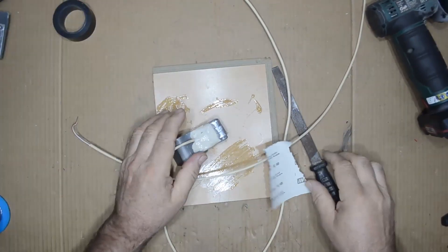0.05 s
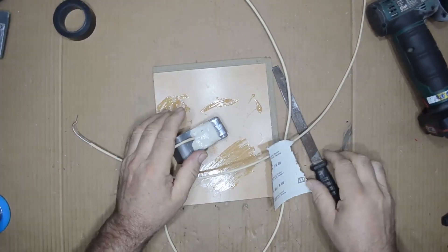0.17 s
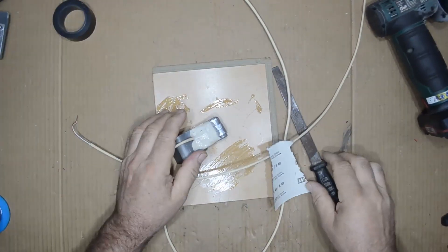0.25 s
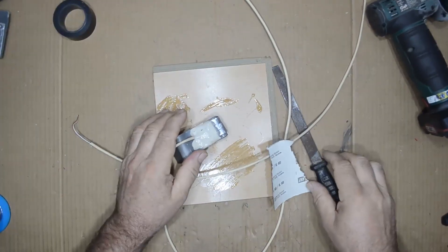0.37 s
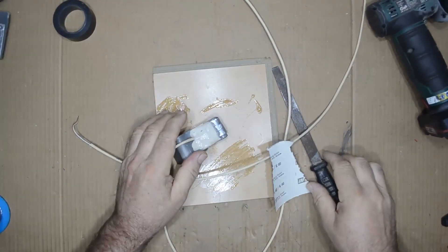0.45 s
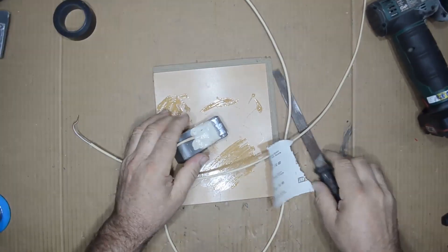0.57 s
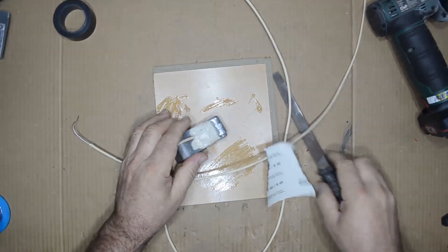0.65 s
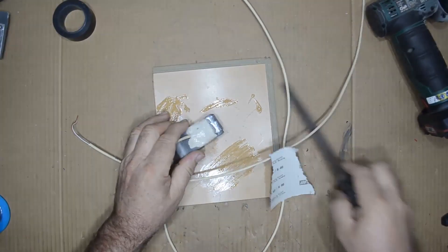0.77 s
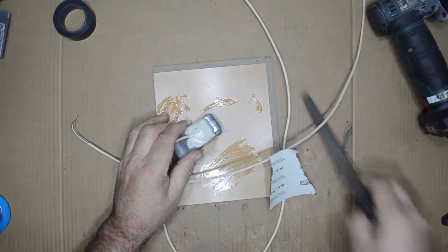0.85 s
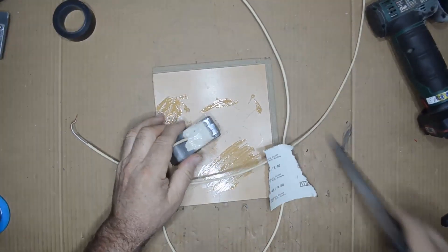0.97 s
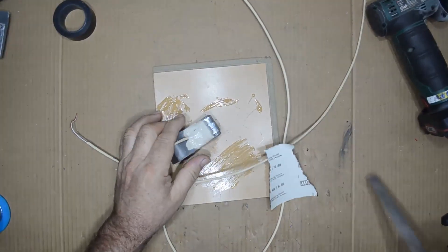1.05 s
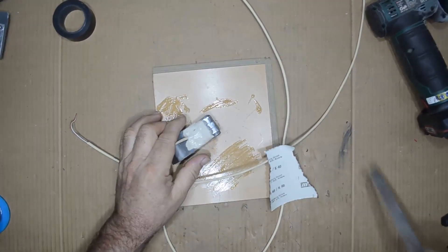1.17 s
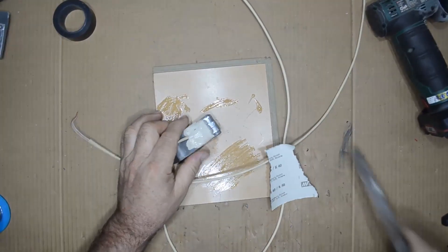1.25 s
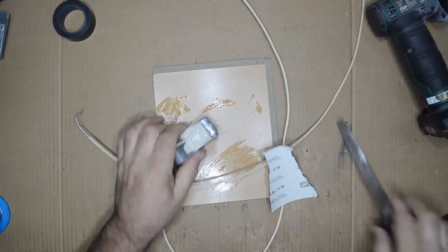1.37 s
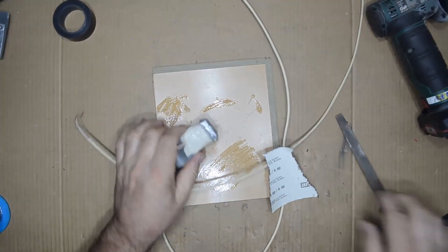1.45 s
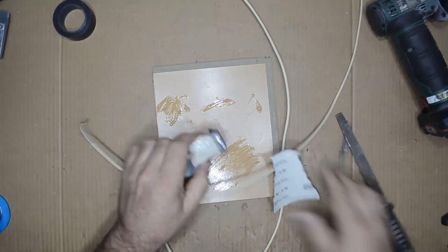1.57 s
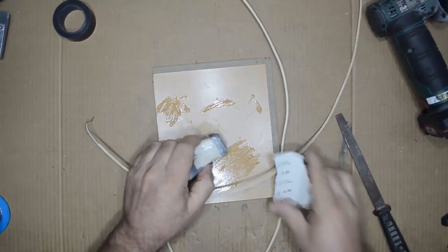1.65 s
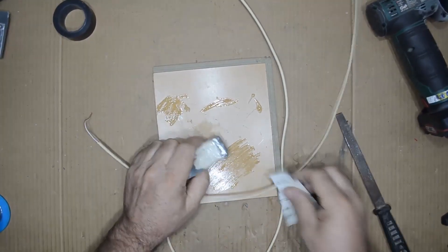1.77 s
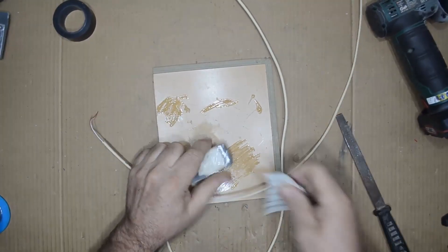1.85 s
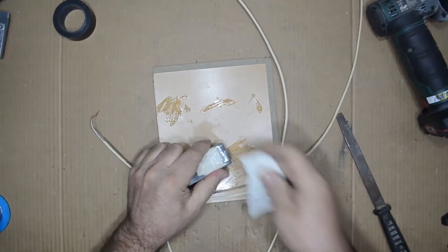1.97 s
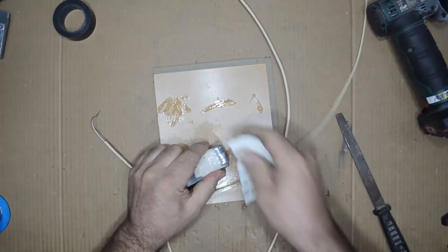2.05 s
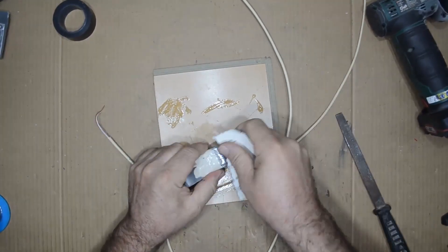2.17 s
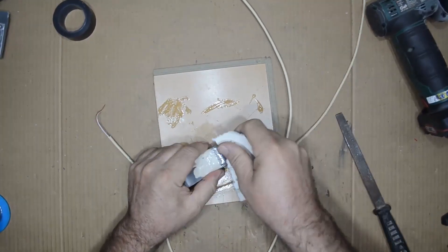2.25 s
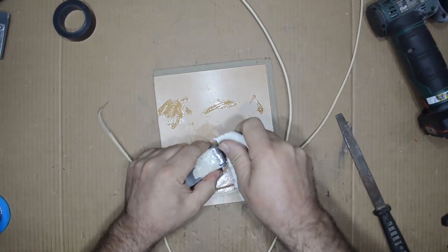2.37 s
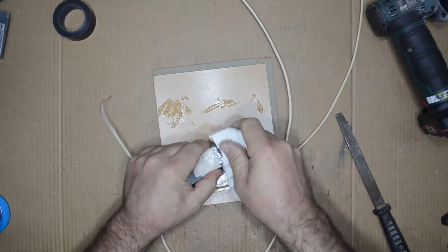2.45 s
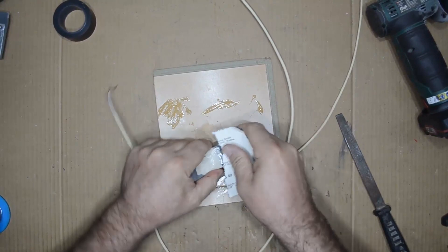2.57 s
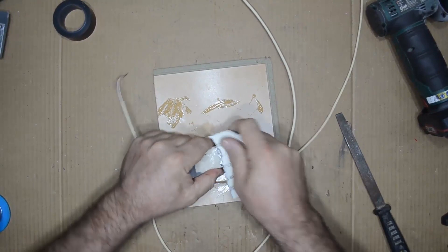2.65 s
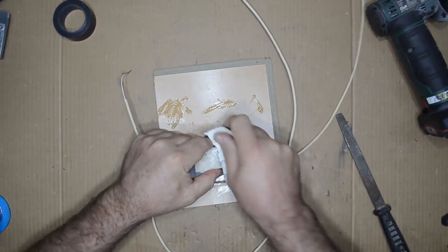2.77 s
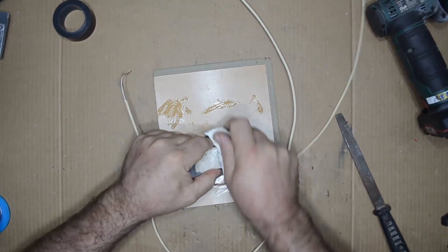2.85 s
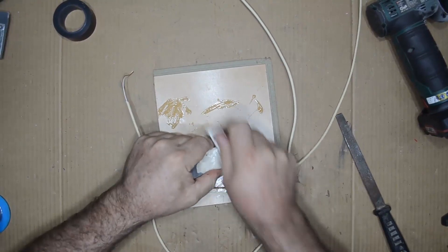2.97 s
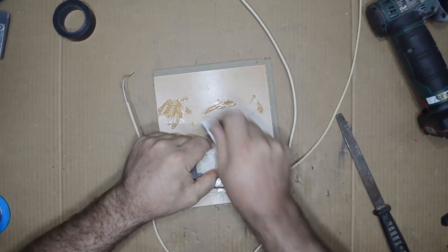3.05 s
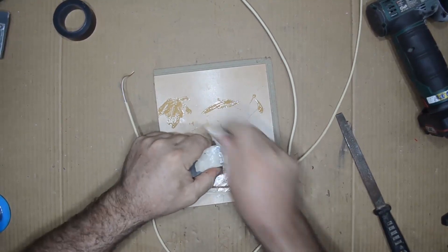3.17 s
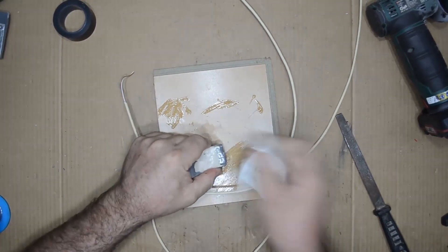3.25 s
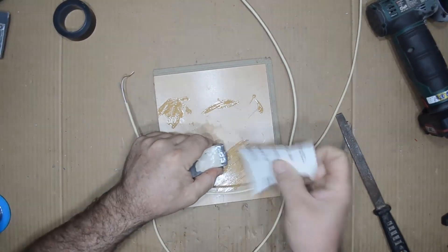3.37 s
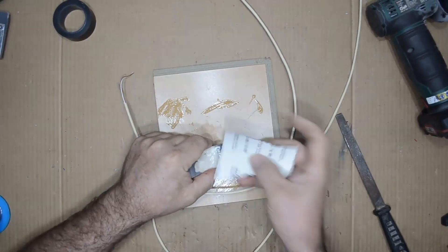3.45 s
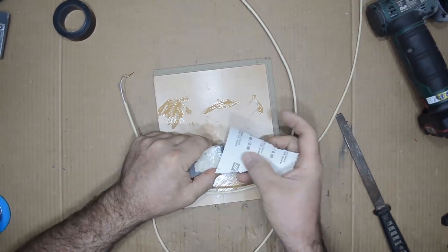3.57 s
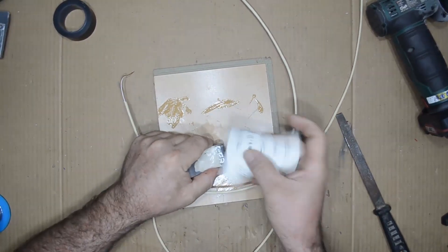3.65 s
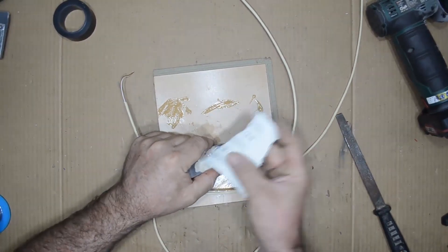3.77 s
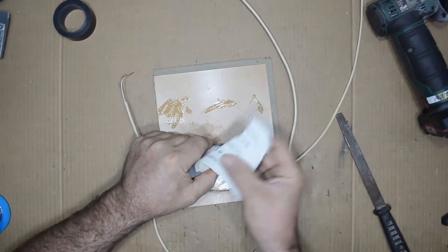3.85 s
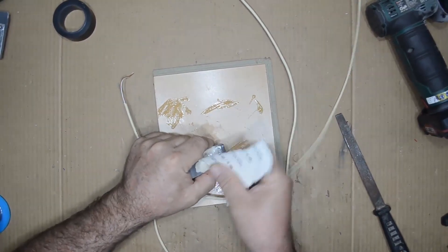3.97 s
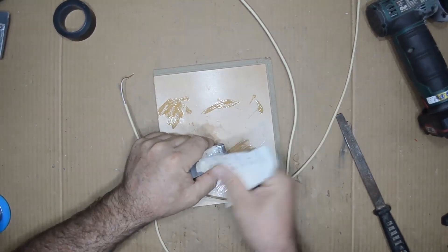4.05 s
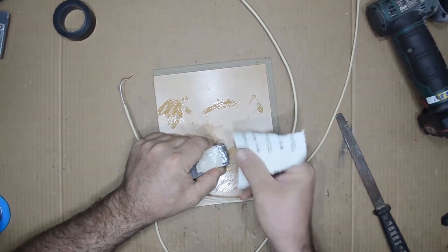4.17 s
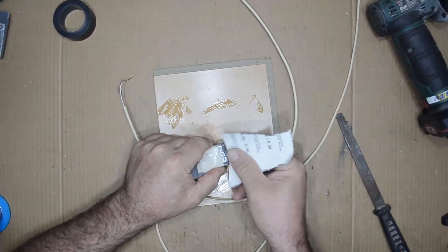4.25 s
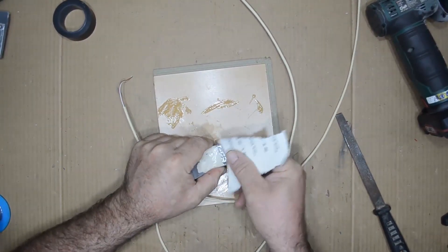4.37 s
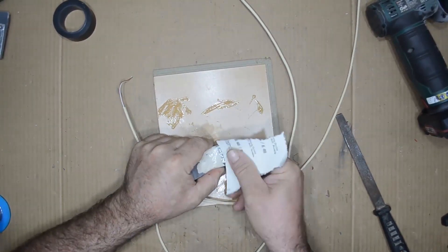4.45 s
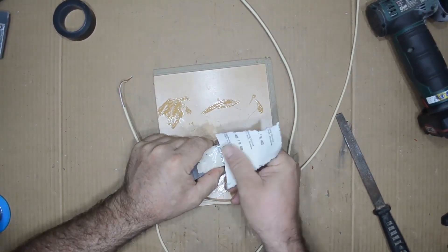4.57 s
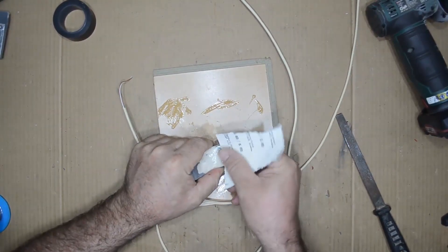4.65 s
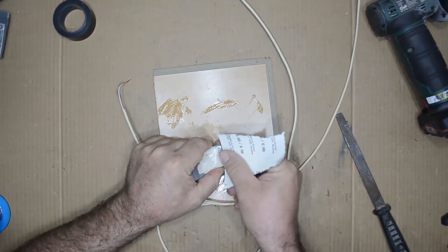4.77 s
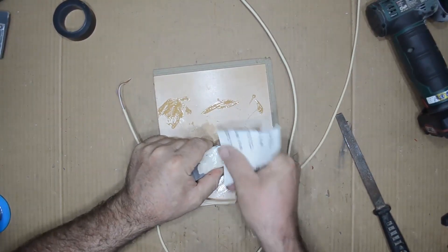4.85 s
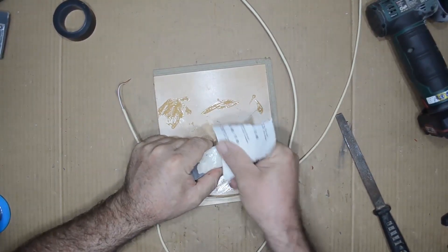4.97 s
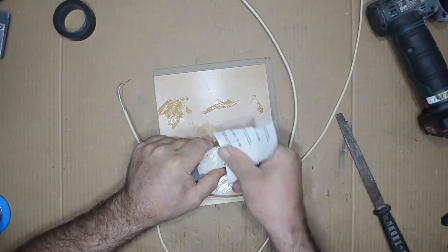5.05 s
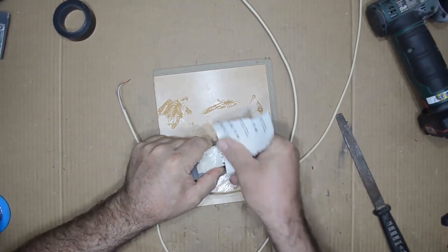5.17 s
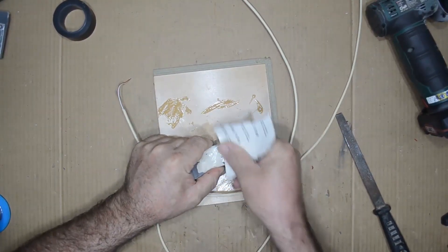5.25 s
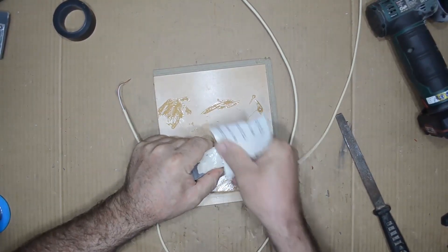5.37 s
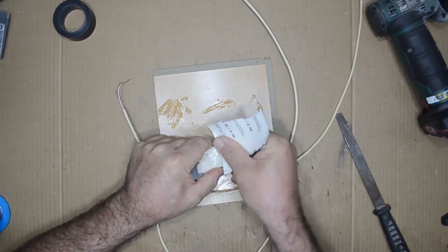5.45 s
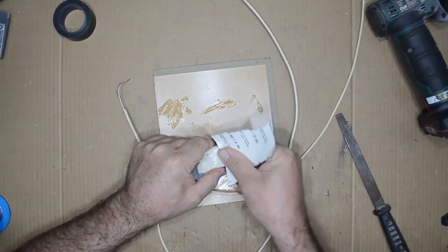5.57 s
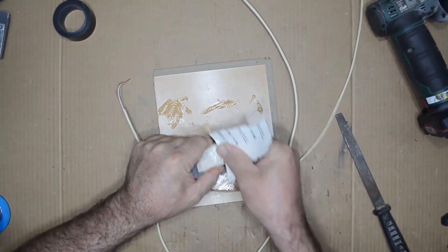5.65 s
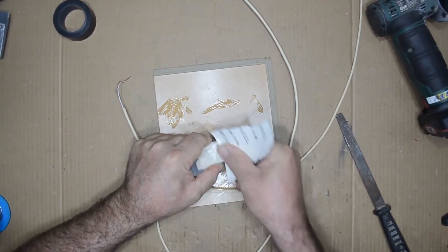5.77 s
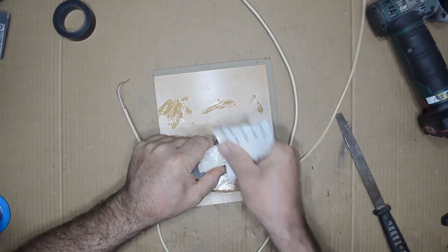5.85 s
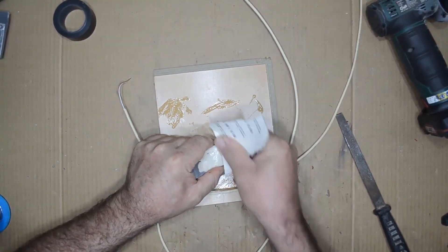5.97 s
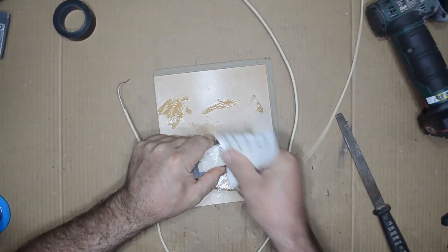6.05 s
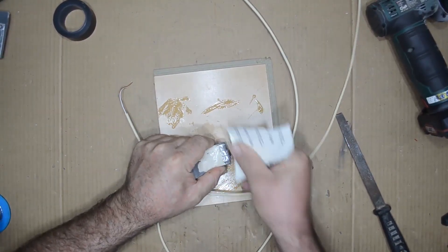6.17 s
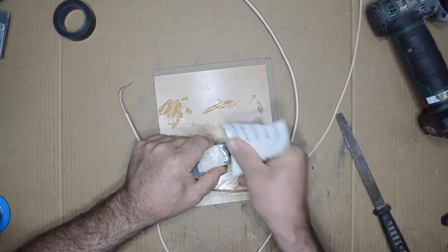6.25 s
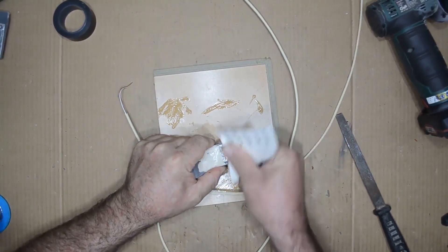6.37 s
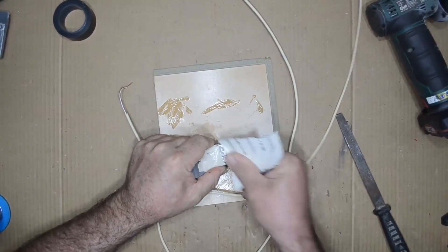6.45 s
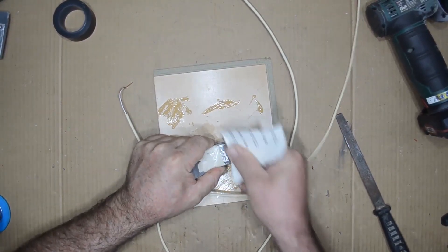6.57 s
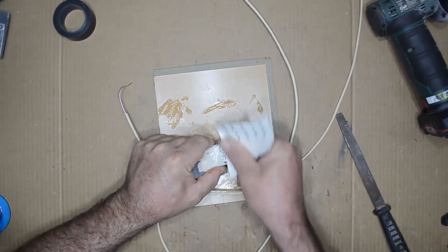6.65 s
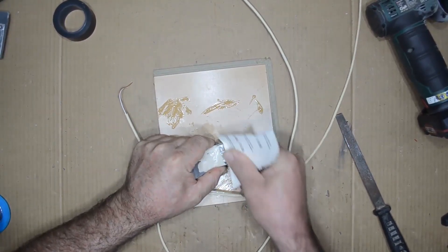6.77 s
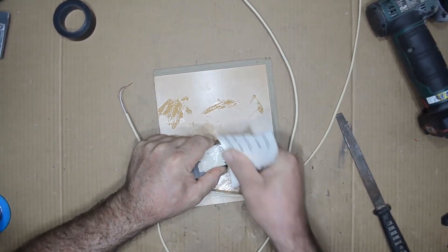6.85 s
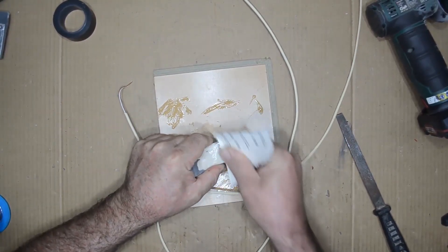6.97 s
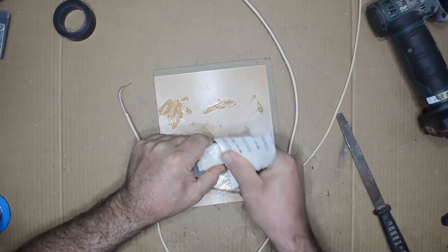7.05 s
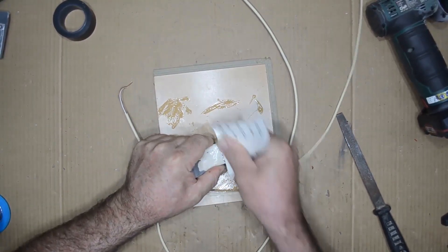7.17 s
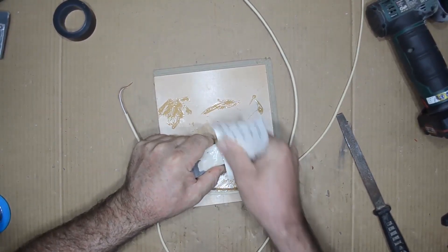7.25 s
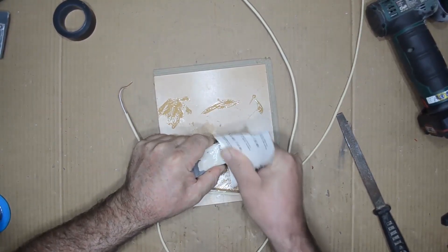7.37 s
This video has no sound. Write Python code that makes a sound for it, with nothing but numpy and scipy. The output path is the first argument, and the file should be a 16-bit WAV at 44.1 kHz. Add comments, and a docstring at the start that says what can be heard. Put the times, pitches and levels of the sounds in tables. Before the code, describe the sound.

Low, soft room air runs throughout, with a close perspective and a short hard-room echo. From 0 to 1 s a file drags lightly over cardboard, with barely audible wavering squeaks and small taps, and a firmer knock at 0.94. Around 1.3-1.8 s it is laid down: scrapes, weighty thuds, a loud hard clack at 1.62 and another knock near 1.78. Sandpaper is snatched up at 1.7, then crinkles and rustles from 2 to 4 s, with crisp folds and snaps strongest around 2.85-3.1. It nearly falls quiet from 4.1 to 4.7, with only faint rustle and two light taps. From 4.8 s short gritty strokes rub a small hollow metal part, dry and mid-pitched, with a bright snap at 5.1. They come unevenly, intensify at 6.0-6.1 and 6.4, and continue with sharp papery flaps around 7.0 and 7.4, ending mid-action.

```python
"""Knocks and scrapes on a cardboard-covered bench, crinkling and snapping paper, then short rasping strokes.
A file is laid down, sandpaper is picked up and folded, and a thumb rubs it over a small curved metal part.
Scrapes and strokes are random slips shaped by hand speed and filtered by sheet, held part and bench;
knocks and snaps are dying sines with noise bursts; squeaks are wavering partials.
Filtered noise makes the air, and convolution adds nearby ringing objects and a small hard room."""
import sys
import numpy as np
from scipy import signal
from scipy.io import wavfile
from scipy.ndimage import uniform_filter1d

SR = 44100
rng = np.random.default_rng(int(sys.argv[2]) if len(sys.argv) > 2 else 0)


def transcribe(u):
    """Save the signal u as a 16-bit wav file named by the first command-line argument.

    u: samples, shape (n,) or (channels, n), limited to [-1, 1]; the rate is SR.
    q: integer samples, one column per channel.
    """
    v = np.clip(np.atleast_2d(u).T, -1, 1)
    q = np.round(v * 32767).astype(np.int16)
    wavfile.write(sys.argv[1], SR, q)


N = 327222
TIME = np.arange(N) / SR


def amp(db):
    """Logarithmic level: decibels become an amplitude gain."""
    return 10 ** (np.asarray(db) / 20)


def between(ends_db, share):
    """Linear interpolation: a level part of the way from the first end to the second."""
    return np.interp(share, [0, 1], ends_db)


def evened(x):
    """Power normalisation: scales to rms 1."""
    return x / np.sqrt(np.mean(x ** 2) + 1e-20)


def peaked(x):
    """Peak normalisation: scales the largest excursion to 1."""
    return x / np.max(np.abs(x))


def read(points, hz):
    """Interpolation over log frequency: joins the points by straight lines."""
    point_hz, value = np.transpose(points)
    return np.interp(np.log(hz + 1), np.log(point_hz + 1), value)


def add(mix, s, sound):
    """Superposition: lays a sound into the mix at s seconds, cut off at the end."""
    part = mix[round(s * SR):][:len(sound)]
    part += sound[:len(part)]


def colour(x, spectrum, size=2048):
    """Minimum-phase filtering with unit energy: each click rings only after it lands."""
    hz = abs(np.fft.fftfreq(size, 1 / SR))
    log_gain = np.log(amp(read(spectrum, hz)))
    # the Hilbert transform of the log gain gives the phase of a causal filter
    response = np.exp(np.conj(signal.hilbert(log_gain)))
    ring = np.fft.ifft(response).real[:size // 2]
    return signal.oaconvolve(x, ring / np.linalg.norm(ring))[:len(x)]


def ringing(modes):
    """Modal decay: a sum of exponentially dying sines, alternating in sign from mode to mode."""
    t = TIME[:SR // 2]
    out = np.zeros(len(t))
    for k, (hz, db, t60) in enumerate(modes):
        decay = amp(db - 60 * t / t60)
        out += (-1) ** k * decay * np.sin(2 * np.pi * hz * t)
    return out


def crack(spectrum, t60, rise_s):
    """Impulsive noise: a coloured burst with a quick rise and an exponential decay."""
    t = TIME[:SR // 2]
    envelope = peaked((1 - np.exp(-t / rise_s)) * amp(-60 * t / t60))
    return colour(rng.standard_normal(len(t)) * envelope, spectrum)


# Background air. Each row: frequency in Hz, relative level in dB.
AIR_COLOUR = [(25, -16.5), (50, -11.5), (108, -10), (170, -19), (260, -10.5), (600, -11.5), (900, -10.5),
              (1800, -15), (3000, -22.5), (4700, -33), (13500, -39), (16000, -61)]


def still_air(level_db=-58):
    """Stationary noise: a steady random murmur with a fixed spectrum."""
    return amp(level_db) * colour(rng.standard_normal(N), AIR_COLOUR, size=8192)


# Echo spectrum; treble is partly swallowed by cardboard and arms.
# Each row: frequency in Hz, relative level in dB.
ECHO_COLOUR = [(100, 5), (2500, -2.5), (6000, -3), (14000, -3.5)]


def tail(decay, gap_s):
    """Diffuse reverberation of unit energy: dense reflections, each band dying at its own speed."""
    hz, t, bands = signal.stft(rng.standard_normal(SR), SR, nperseg=256)
    start_db = read(ECHO_COLOUR, hz)[:, None]
    level_db = start_db - 60 * t / read(decay, hz)[:, None]
    echo = signal.istft(bands * amp(level_db), SR)[1][:SR]
    echo *= np.clip(TIME[:SR] / gap_s - 1, 0, 1)  # silent for one gap, then rises over a second gap
    return echo / np.linalg.norm(echo)


# Dying away of the near reflections. Each row: frequency in Hz, 60 dB decay time in seconds.
NEAR_WALLS = [(100, 0.34), (1000, 0.24), (2200, 0.4), (6000, 0.18), (14000, 0.3)]
# Dying away of the whole room. Each row: frequency in Hz, 60 dB decay time in seconds.
WHOLE_ROOM = [(100, 0.8), (1000, 0.7), (2500, 0.78), (6000, 0.73), (14000, 0.16)]


def room_echo(paper, blows):
    """Room response: convolution with early near-wall reflections and a weaker late tail."""
    room = tail(NEAR_WALLS, gap_s=0.0013) + amp(-6.5) * tail(WHOLE_ROOM, gap_s=0.013)
    return signal.fftconvolve(amp(-10) * paper + amp(-10.5) * blows, room)[:N]


# Things around the bench that ring along.
# Each row: frequency in Hz, relative level in dB, 60 dB decay time in seconds.
RINGING_THINGS = [(519, -7, .3), (760, -2, .3), (930, -3, .2), (1004, 0, .15), (1074, -1, .2),
                  (1190, -3, .2), (1309, -5, .2), (1487, -3, .25), (1764, -2, .2), (1991, -1, .25),
                  (2113, -3, .2), (2376, -3, .2), (2883, -6, .25)]


def sympathetic_ringing(paper, blows, paper_db=-18, blow_db=-22):
    """Sympathetic resonance: the sources excite the modes of things around the bench."""
    rings = ringing(RINGING_THINGS)
    drive = amp(paper_db) * paper + amp(blow_db) * blows
    return signal.fftconvolve(drive, rings / np.linalg.norm(rings))[:N]


def grains(per_s, spread_db, clump_db, clump_s):
    """Stochastic friction: tiny slips of random size and sign that come in clumps, at rms 1."""
    size = amp(spread_db * np.minimum(rng.exponential(1, N), 4))
    slips = size * rng.choice([-1, 1], N) * (rng.random(N) < per_s / SR)
    knots = np.arange(0, N / SR + 1, clump_s)
    clumps = np.interp(TIME, knots, rng.uniform(-1, 1, len(knots)))
    return evened(slips * amp(clump_db * clumps))


def gestures(rows, mix, sharpness, rise, hiss_lead_s=0):
    """Friction follows speed: each move swells and fades, giving gains for body, sheet, hiss and push."""
    out = np.zeros((4, N))
    for peak, length, db, crisp in rows:
        phase = np.arange(0, length, 1 / SR) / length
        speed = np.interp(phase, [0, rise, 1], [0, 1, 0]) ** sharpness
        levels_db = [db] + [db + between(ends_db, crisp) for ends_db in mix]
        for gain, level_db, lead_s in zip(out, levels_db, (0, 0, hiss_lead_s, 0)):
            add(gain, peak - rise * length - lead_s, amp(level_db) * speed)
    return out


# The hollow held part. Each row: frequency in Hz, relative level in dB.
HOLLOW_COLOUR = [(100, -28), (250, -12), (400, -14.5), (540, -6), (700, -7), (980, 2), (1150, 0.5),
                 (1450, -8), (2100, -15.5), (4000, -30.5), (12000, -53)]
# The stiff sheet. Each row: frequency in Hz, relative level in dB.
SHEET_COLOUR = [(300, -18), (900, -14), (1400, -1), (2050, -0.5), (2850, -8.5), (3600, -18.5),
                (5500, -19.5), (12000, -73.5)]
# The hand's push on the bench. Each row: frequency in Hz, relative level in dB.
PUSH_COLOUR = [(25, -79), (50, -28), (80, -10), (110, 2.5), (150, -8), (190, -17), (260, -17.5),
               (450, -22.5), (1500, -67)]


def rub(gains, slips, fine, hiss_colour):
    """Source and filter: coarse slips shake part and sheet, fine ones shake sheet and hiss, noise pushes."""
    body, sheet, hiss, push = gains
    hollow = colour(body * slips, HOLLOW_COLOUR)
    rasp = colour(sheet * evened(slips + fine), SHEET_COLOUR)
    bright = colour(hiss * fine, hiss_colour)
    rumble = colour(push * rng.standard_normal(N), PUSH_COLOUR)
    return hollow + rasp + bright + rumble


# Faint squeaks as the file drags.
# Each row: start in seconds, end in seconds, base pitch in Hz, relative level in dB.
SQUEAKS = [(0.02, 0.225, 430.3, -53.5), (.48, 0.642, 447, -52.5)]
# Their partials. Each row: multiple of the base pitch, relative level in dB.
SQUEAK_PARTIALS = [(0.998, 1.5), (1.569, -4.5), (1.998, 4.5), (3.039, -0.5)]


def squeaks(waver=0.0544):
    """Stick-slip oscillation: friction settles briefly into a wavering note that swells and fades."""
    out = np.zeros(N)
    for start, end, hz, db in SQUEAKS:
        drift = evened(uniform_filter1d(rng.standard_normal(N), size=400))
        drift = drift[:int((end - start) * SR)]
        turns = np.cumsum(hz * (1 + waver * drift)) / SR  # waver is the rms share of the pitch
        note = sum(amp(part_db) * np.sin(2 * np.pi * k * turns) for k, part_db in SQUEAK_PARTIALS)
        add(out, start, amp(db) * note * np.hanning(len(note)))
    return out


# File and metal part slide over the cardboard.
# Each row: peak time in seconds, length in seconds, relative force in dB, crispness from 0 to 1.
SLIDES = [(.14, 0.2, -64, 0), (.59, 0.62, -49, 0.58), (.74, 0.27, -52.5, 0), (.935, 0.15, -46, 0.64),
          (1.38, 0.41, -51.5, 1), (1.56, .24, -40.5, 0.88)]
# Rows for sheet, hiss and push. Each row: dull level, crisp level, both in dB against the force.
SLIDE_MIX = [(-13, -4.5), (-21.5, -14.5), (-28, 1.5)]
# Rustling hiss, shared with the handling. Each row: frequency in Hz, relative level in dB.
RUSTLE_COLOUR = [(1200, -65), (3500, 5.5), (5500, -1), (8000, -2.5), (11000, -3), (15000, -12),
                 (16500, -28)]


def sliding(level_db=-1.0):
    """Sliding friction: the file and the metal part scrape over cardboard in random slips."""
    slips = grains(per_s=2500, spread_db=3, clump_db=10, clump_s=0.006)
    fine = grains(per_s=7000, spread_db=0.5, clump_db=10, clump_s=0.0079)
    gains = gestures(SLIDES, SLIDE_MIX, sharpness=1.1, rise=0.38)
    return amp(level_db) * rub(gains, slips, fine, RUSTLE_COLOUR)


# File and metal part knock on the bench, from light taps to the full weight.
# Each row: start in seconds, knock level in dB, weight from 0 to 1.
KNOCKS = [(0.4701, -27, 0.33), (0.726, -30, 0.54), (0.9419, -16, 0.42), (1.329, -35, 1), (1.421, -17, 1),
          (1.5213, -22.5, 1), (1.528, -25, 0.88), (1.572, -43, 1), (1.620, -5, 0.34), (1.683, -18, 0.56),
          (1.7753, -11, 0), (1.983, -21.5, 0.3), (2.252, -38, 0.2), (4.525, -32.5, .7), (4.612, -35, 0.3)]
# What a knock rings with. Each row: frequency in Hz, relative level in dB, 60 dB decay time in seconds.
KNOCK_MODES = [(817, -2, 0.02), (992, 1.5, 0.012), (1500, -9, 0.017)]
# Bench resonances. Each row: frequency in Hz, relative level in dB, 60 dB decay time in seconds.
BENCH_MODES = [(58, -7, 0.13), (107, -1.5, 0.12), (163, -9, 0.08), (259, 1, 0.08), (328, -3, 0.07)]
# The clack. Each row: frequency in Hz, relative level in dB.
CLACK_COLOUR = [(150, -20), (420, 1), (700, 3.5), (1300, 1), (2100, -0.5), (3300, -8.5), (5000, -24),
                (9000, -24.5), (15000, -31)]
# The thudding bench top. Each row: frequency in Hz, relative level in dB.
THUD_COLOUR = [(30, -24), (65, -6.5), (130, -5), (260, 8), (500, -1.5), (750, -30), (2000, -46)]


def knocks(thud_lag_s=0.00485, clack_db=(-21, -5.5), thud_db=(-48, -2.5)):
    """Impact excitation: a blow rings short modes; more weight brings out clack and delayed bench thud."""
    # clack and thud: dB against the knock for a light tap, then with the full weight
    out = np.zeros(N)
    knock, boom = peaked(ringing(KNOCK_MODES)), peaked(ringing(BENCH_MODES))
    for s, db, weight in KNOCKS:
        clack = crack(CLACK_COLOUR, t60=0.025, rise_s=0.00077)
        thud = amp(-5.5) * boom + amp(-7.5) * crack(THUD_COLOUR, t60=0.081, rise_s=0.00088)
        add(out, s, amp(db) * (knock + amp(between(clack_db, weight)) * clack))
        add(out, s + thud_lag_s, amp(db + between(thud_db, weight)) * thud)
    return out


def flap(hz, t60=0.0095, lower=0.79, lower_db=-11, upper=1.486, upper_db=-5):
    """Free vibration: the freed sheet swings for a few cycles in three quickly damped modes."""
    return peaked(ringing([(hz * lower, lower_db, t60), (hz, 0, t60), (hz * upper, upper_db, t60)]))


# Bright sound of the grit. Each row: frequency in Hz, relative level in dB.
GRIT_COLOUR = [(1200, -19), (3200, -5.5), (4500, -2), (5600, -6), (7300, 1), (8800, -1.5), (10300, -0.5),
               (13000, -6.5), (15200, -16), (16500, -1)]


def tear(level_db=2, tick_db=5, scatter_db=1.5):
    """Sudden release: grit tears loose with a sharp tick and a bright crack of slightly varied colour."""
    spectrum = [(hz, db + scatter_db * rng.standard_normal()) for hz, db in GRIT_COLOUR]
    tick = peaked(colour(signal.unit_impulse(SR // 2), spectrum))
    return amp(level_db) * crack(spectrum, t60=0.011, rise_s=0.00081) + amp(tick_db) * tick


# Pitches the held sheet favours, in Hz: the first follows the body gain, the second the sheet gain.
CATCH_HZ = [1010, 1994]


def catches(gains, per_s=18, flap_db=16.5, crack_db=7.5, spread_db=14):
    """Random point process: small snaps at chance moments, scaled by the move that causes them."""
    body, sheet, hiss, push = gains
    out = np.zeros(N)
    for hz, swing in zip(CATCH_HZ, (body, sheet)):  # per_s is the mean rate at each pitch
        clicks = (rng.random(N) < per_s / SR) * amp(-spread_db * rng.random(N))
        out += amp(flap_db) * signal.oaconvolve(clicks * swing, flap(hz))[:N]
        out += amp(crack_db) * signal.oaconvolve(clicks * hiss, tear())[:N]
    return out


# The sheet is snatched up, folded and turned over.
# Each row: peak time in seconds, length in seconds, relative force in dB, crispness from 0 to 1.
RUSTLES = [(1.695, .045, -28.5, 0.54), (1.76, 0.18, -45.5, 0.71), (2.02, 0.39, -51.5, 0.16),
           (2.268, 0.12, -49, 0), (2.41, 0.3, -58.5, 0.43), (2.565, 0.19, -50.5, 0.3),
           (2.7, 0.26, -52, 0.18), (2.853, 0.14, -37, 0.16), (2.995, 0.16, -39.5, 0.69),
           (3.108, 0.074, -32.5, 0.5), (3.225, 0.19, -57.5, 1), (3.385, 0.22, -50.5, 0.35),
           (3.495, 0.097, -56, 0.84), (3.607, 0.22, -52.5, 0.54), (3.925, 0.22, -48, 1),
           (4.13, .26, -66, .9), (4.38, .2, -70, 1), (4.61, 0.23, -54, 0.3)]
# Rows for sheet, hiss and push. Each row: dull level, crisp level, both in dB against the force.
RUSTLE_MIX = [(-6, 9), (-14, -1.5), (-15.5, -10.5)]


def handling():
    """Crumpling noise: the loose sheet crinkles in the fingers in clumped slips and small snaps."""
    slips = grains(per_s=1100, spread_db=4.0, clump_db=10, clump_s=0.006)
    fine = grains(per_s=4500, spread_db=2.0, clump_db=7, clump_s=0.004)
    gains = gestures(RUSTLES, RUSTLE_MIX, sharpness=1.265, rise=0.41, hiss_lead_s=0.0022)
    return rub(gains, slips, fine, RUSTLE_COLOUR) + catches(gains)


# Snaps where the sheet catches on an edge and tears free.
# Each row: start in seconds, flap level in dB, pitch of the sheet in Hz, relative crack level in dB.
SNAPS = [(2.098, -35, 1930, -61), (2.5, -42.5, 2110, -49.5), (2.776, -36.5, 2840, -49.5),
         (2.826, -29, 2310, -41), (2.879, -21.5, 2070, -38), (3.046, -28, 2300, -41.5),
         (3.088, -27, 1800, -35), (3.2297, -26, 1920, -47), (4.9726, -36, 1210, -39.5),
         (5.1052, -16.5, 1740, -27), (5.2453, -35, 960, -36), (5.261, -19, 940, -26.5),
         (5.4856, -27, 2400, -27), (5.5856, -23, 1110, -37.5), (5.7369, -31.5, 1040, -39.5),
         (5.8607, -23, 1020, -40), (5.9728, -32, 920, -38.5), (5.9876, -31, 910, -31),
         (6.0107, -19, 1000, -29.5), (6.0443, -12.5, 2030, -38), (6.0501, -12, 1890, -41),
         (6.0713, -15, 1160, -51), (6.3912, -19.5, 1030, -40), (6.3983, -20, 950, -36),
         (6.408, -23, 1070, -46), (6.6705, -23, 2460, -34.5), (6.684, -20, 1680, -31),
         (6.847, -43, 1070, -35.5), (6.9742, -25, 1000, -32.5), (6.9945, -10.5, 1180, -30),
         (6.9983, -13, 1770, -33), (7.1323, -20.5, 980, -34.5), (7.3453, -23, 1020, -37),
         (7.3852, -21, 980, -31.5), (7.4067, -12, 2330, -27.5)]


def snaps(recoil_db=-31):
    """Stored strain let go: grit tears loose, the freed sheet flaps, and the hand jolts the bench."""
    out, boom = np.zeros(N), peaked(ringing(BENCH_MODES))
    for s, flap_db, hz, crack_db in SNAPS:
        swing = flap(hz) + amp(recoil_db) * boom
        add(out, s, amp(flap_db) * swing + amp(crack_db) * tear())
    return out


# Sanding strokes, to and fro; bite is how hard the grit digs into the edge.
# Each row: peak time in seconds, length in seconds, relative force in dB, bite from 0 to 1.
STROKES = [(4.838, .13, -42.5, 0.3), (4.97, 0.17, -48.5, 0.5), (5.06, 0.055, -50.5, 0.83),
           (5.125, 0.08, -36, .1), (5.232, .13, -39, 0.43), (5.378, 0.15, -41.5, 0.41),
           (5.505, .12, -37.5, 0.64), (5.595, 0.076, -44.5, 0), (5.735, 0.073, -43, 0.55),
           (5.868, .13, -38, 0.26), (5.995, 0.1, -35, 0.3), (6.05, 0.12, -33, 0.7), (6.35, .1, -40.5, 0.46),
           (6.418, 0.089, -30.5, 0.53), (6.695, 0.082, -39, 0.7), (6.74, 0.2, -45.5, 0.92),
           (6.865, 0.098, -38.5, 0), (7.003, 0.16, -36.5, 0.63), (7.12, 0.12, -34.5, 0.3),
           (7.272, 0.17, -38, 0.5), (7.395, 0.12, -33.5, 0.23)]
# Rows for sheet, hiss and push. Each row: level at no bite, level at full bite, in dB against the force.
STROKE_MIX = [(-7.5, 1.5), (-17.5, 0), (-10.5, -11.5)]


def sanding(level_db=1.5, lean_s=5.55, lean_width_s=0.25, lean_db=7):
    """Abrasive friction: grit drags over metal under the thumb; briefly the hand leans harder on the bench."""
    slips = grains(per_s=1800, spread_db=3.0, clump_db=6.5, clump_s=0.0056)
    fine = grains(per_s=4500, spread_db=5.5, clump_db=10, clump_s=0.0024)
    gains = gestures(STROKES, STROKE_MIX, sharpness=1.425, rise=0.55, hiss_lead_s=0.0026)
    lean = np.exp(-((TIME - lean_s) / lean_width_s) ** 2)
    gains[3] *= amp(lean_db * lean)  # row 3 is the push on the bench
    return amp(level_db) * rub(gains, slips, fine, GRIT_COLOUR) + catches(gains)


def scene():
    """Superposition: still air, room echo and sympathetic ringing around the direct sources."""
    paper = sliding() + squeaks() + handling() + snaps() + sanding()
    blows = knocks()
    surroundings = still_air() + room_echo(paper, blows) + sympathetic_ringing(paper, blows)
    return (surroundings + blows + paper)[None]


def record(dry, edge_hz=15900):
    """Band limiting: a linear-phase low-pass removes the highest treble."""
    low_pass = signal.firwin(255, edge_hz, window=("kaiser", 8), fs=SR)
    return signal.oaconvolve(dry, low_pass[None], "same")


dry = scene()
out = record(dry)
transcribe(out)
```